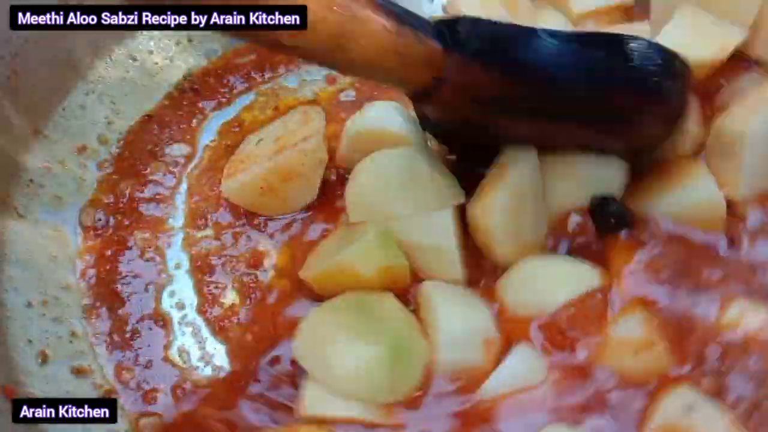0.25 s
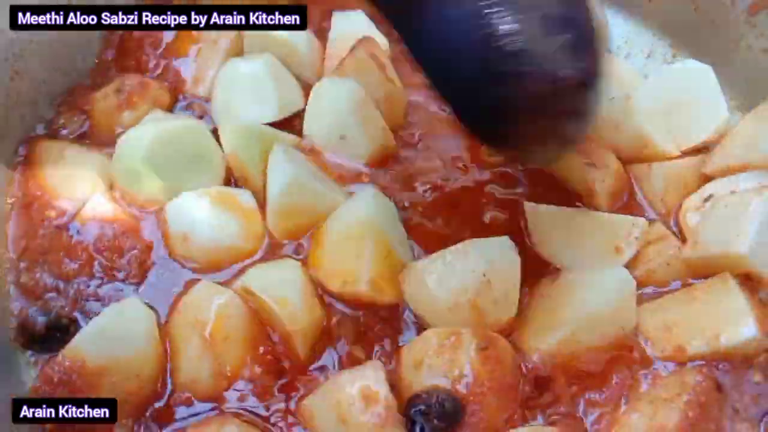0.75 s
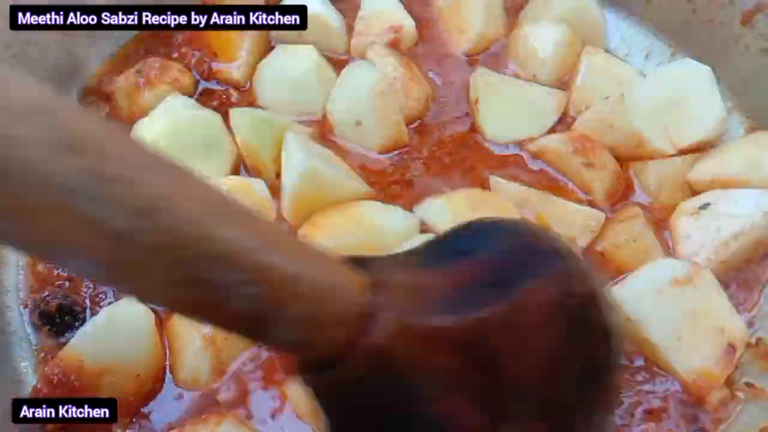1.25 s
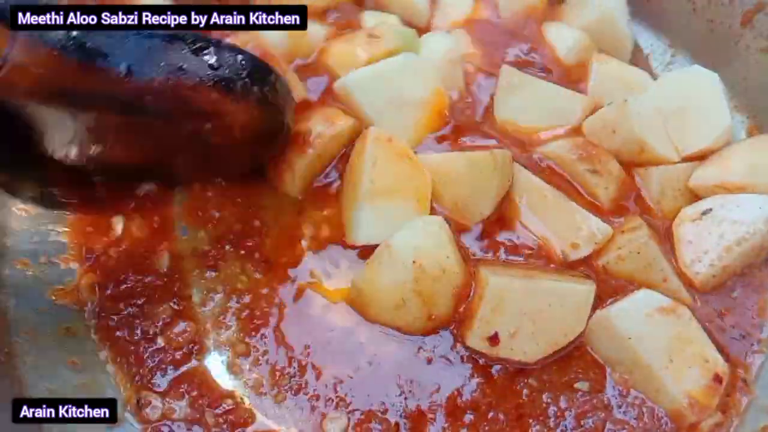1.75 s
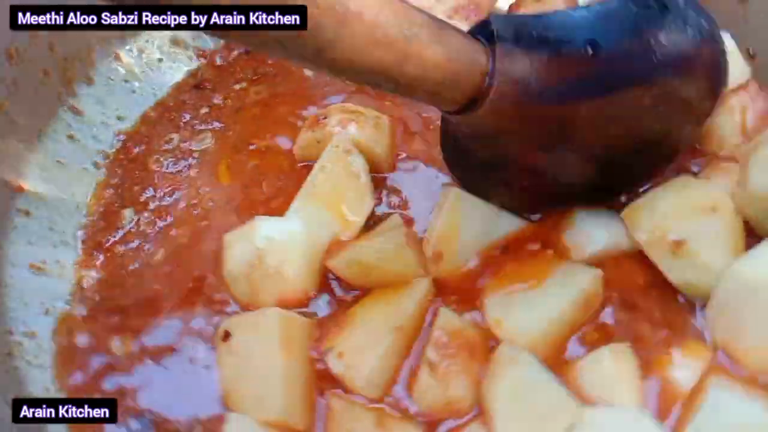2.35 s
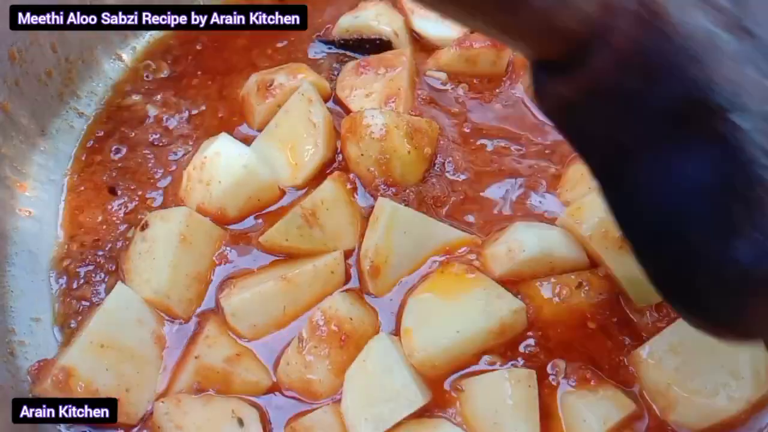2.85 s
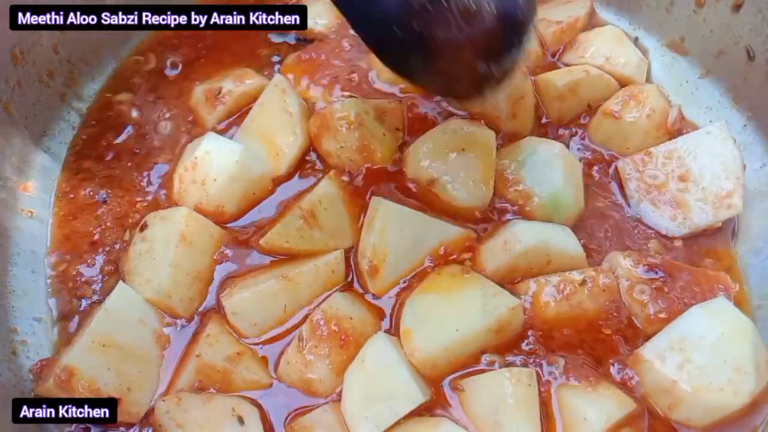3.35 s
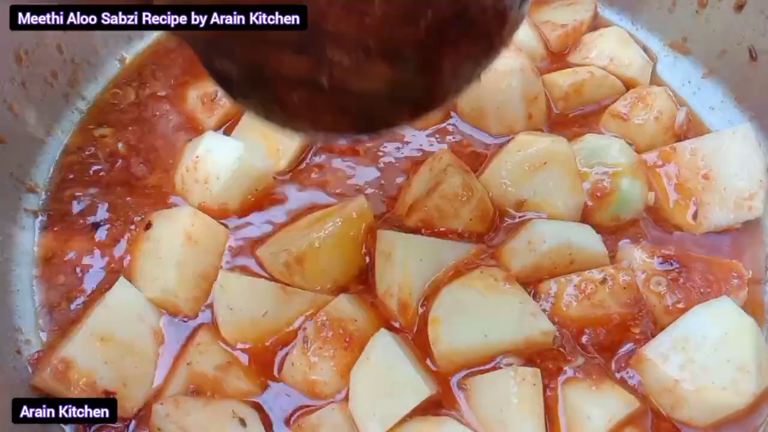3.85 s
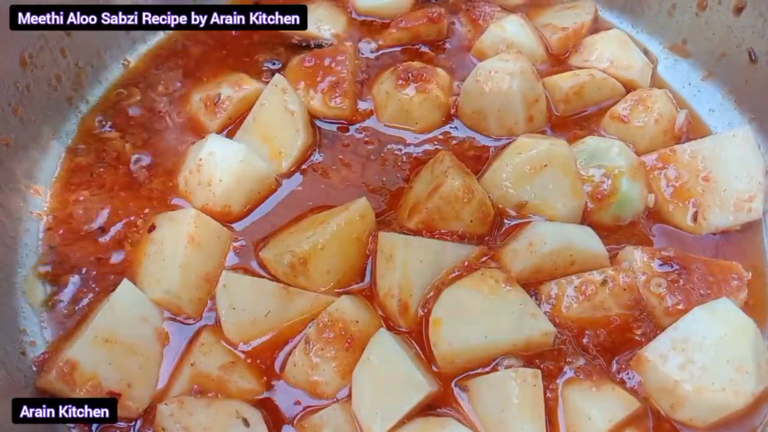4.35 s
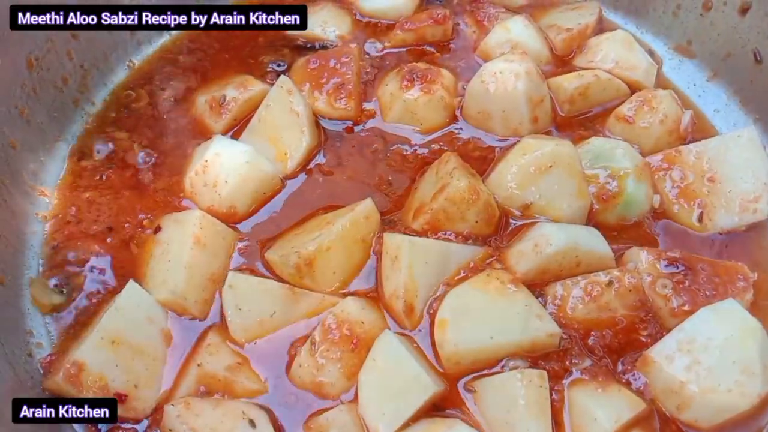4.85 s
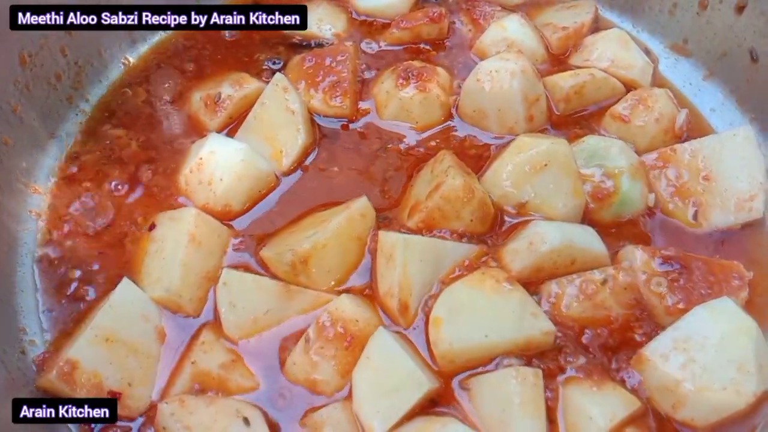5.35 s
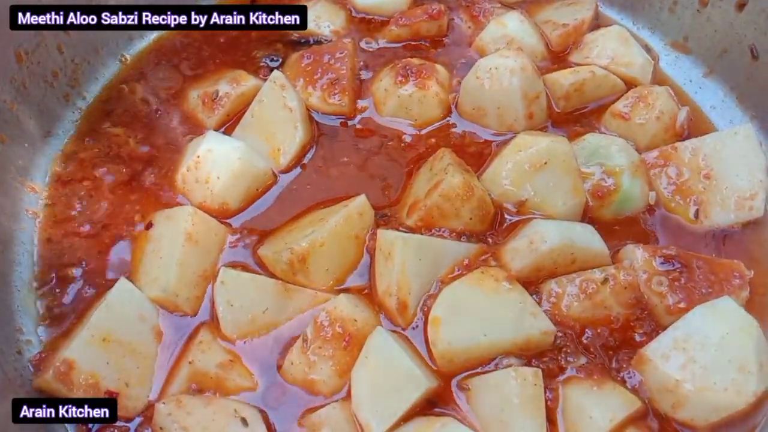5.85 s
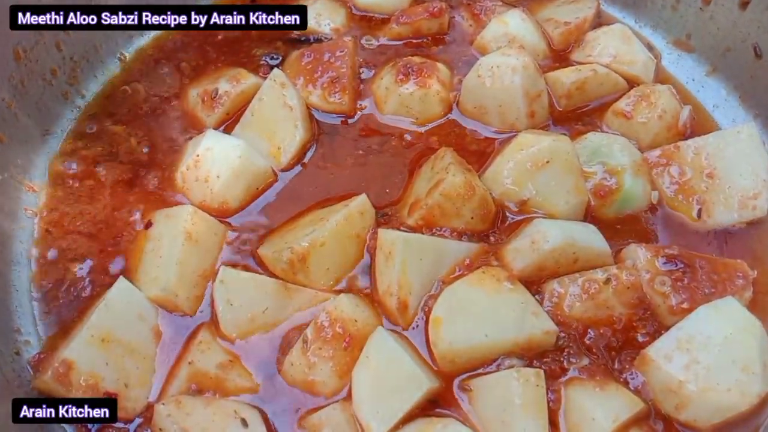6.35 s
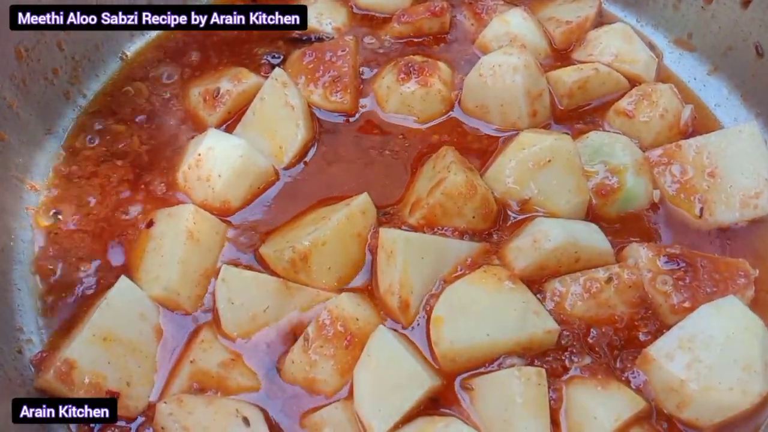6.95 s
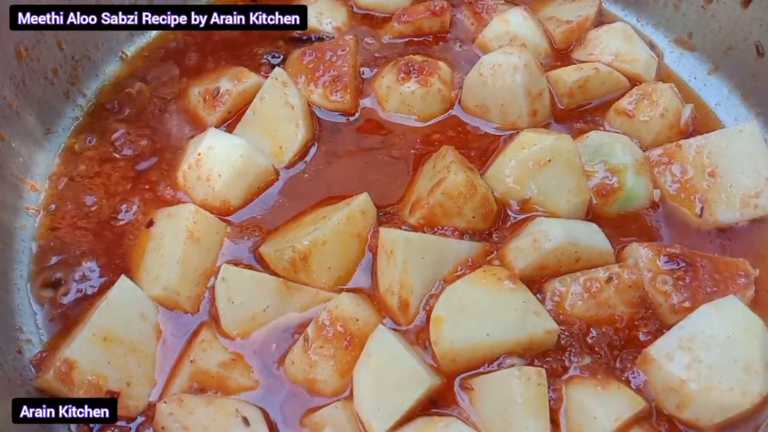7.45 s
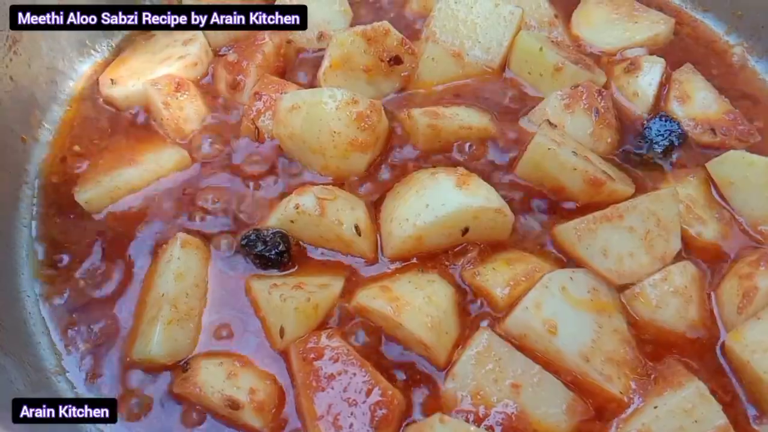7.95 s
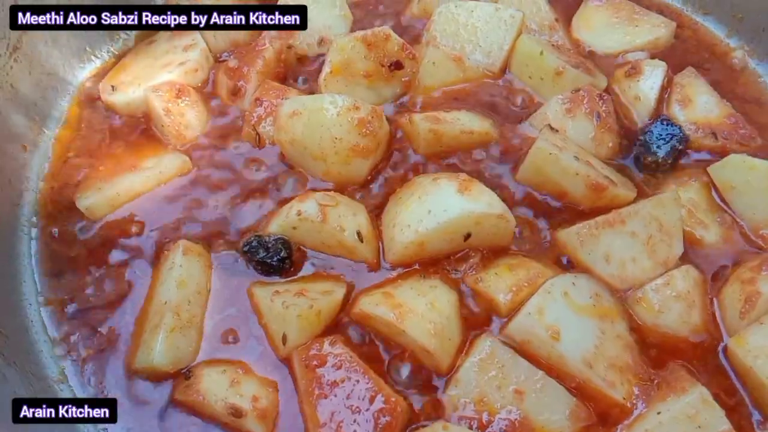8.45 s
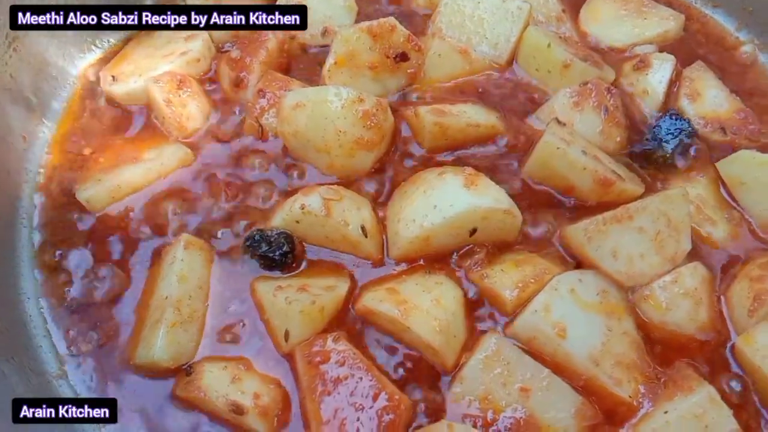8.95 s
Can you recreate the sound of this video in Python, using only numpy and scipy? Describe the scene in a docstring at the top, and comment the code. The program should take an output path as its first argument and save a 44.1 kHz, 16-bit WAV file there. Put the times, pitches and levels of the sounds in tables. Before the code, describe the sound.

Close above a wide metal pan in a kitchen with short, low reverberation, gravy bubbles softly with fine oil crackle and a deep, faint steam hum. From 0.2 to 0.7 seconds chunks bump dully and the wooden spoon knocks lightly; a clearer knock with a booming base falls at 1.0, a soft one at 1.3. Searing swells quickly to a peak near 1.8 and is quenched. Rasping scrapes run from 2.0 to about 4.1, deepening in pitch, with a hard, bright clack at 3.0 and muffled double knocks near 3.7. From 4.3 the simmer rises, with low rumbling surges, gurgles, a soft froth hiss around 5.1, scattered spits and rounded pops. Dull taps fall at 7.5 to 7.65, then at 7.67 the bubbling abruptly becomes louder and brighter, fizzing with crisp sputters until about 9 seconds.

```python
"""In a kitchen, with the microphone close above a wide metal pan, potato chunks are stirred into thick gravy.
A wooden spoon scrapes the base, shoves the chunks and knocks the pan, whose modes ring; smeared gravy sears.
Then the gravy comes back to a simmer, a few dull taps fall and the bubbling is suddenly louder: ringing clicks
make the small bubbles, rising sines the large bursts and the taps, filtered crackle the oil, and dense low
thumps with a deep hum the steam below. The kitchen adds a short, mostly low reverberation."""
import sys
import numpy as np
from scipy import signal
from scipy.fft import rfft, irfft
from scipy.io import wavfile
from scipy.ndimage import uniform_filter1d

SR = 44100
rng = np.random.default_rng(int(sys.argv[2]) if len(sys.argv) > 2 else 0)


def persist_wave(psi):
    """Save psi, clipped to +-1, as 16-bit WAV."""
    counts = np.round(np.clip(psi, -1, 1) * 32767).astype(np.int16)
    wavfile.write(sys.argv[1], SR, np.atleast_2d(counts).T)


N = 405719   # length in samples

# Colours of the sources close to the pan. Each row: frequency in Hz, relative gain in dB.
OIL_COLOUR = [(900, -6.5), (2600, -2), (3600, 0), (4400, -6), (5600, 3.5), (6300, -5.5), (7100, 0),
              (7900, -12), (9000, -35)]
SPRAY_COLOUR = [(6000, -67), (7900, -12), (8600, 6), (10000, 0.5), (12000, -5), (13800, -11.5), (14800, -8),
                (16000, -4.5)]
GRAVY_COLOUR = [(100, -6), (260, 3), (600, -3), (1250, -2.5), (1800, -15), (2500, -13.5)]
STEAM_COLOUR = [(20, -21), (45, -14.5), (95, -14.5), (130, 6), (190, -0.5), (270, -6.5), (400, -16),
                (1000, -69.5)]
CHUNK_COLOUR = [(90, -18), (170, 9), (260, 10), (330, 7.5), (450, -5), (600, 0.5), (1000, -10), (2500, -87)]
SEAR_COLOUR = [(700, -21), (1200, 9), (2000, 1.5), (3000, 9.5), (3900, 11.5), (4900, 3.5), (7000, 6),
               (8200, -8), (13000, -27)]
WOOD_COLOUR = [(50, -37.5), (160, -1), (650, -2.5), (930, -3.5), (1120, -11), (2200, -18), (3100, -26),
               (4000, -23.5), (4450, -9), (5400, -23), (8000, -28)]
# Air resonances between the pan's walls. Each row: frequency in Hz, relative gain in dB.
HOLLOW_COLOUR = [(350, -1), (420, 9), (480, 1), (600, 7.5), (720, 0), (900, 7.5), (1100, -3), (1300, 10.5),
                 (1620, -3.5), (1860, 5), (2100, -7.5), (2290, 0.5), (2460, -13.5), (2760, 1.5),
                 (3070, -15), (3600, 1)]
# Narrow treble resonances that the fizz rings. Each row: frequency in Hz, relative level in dB.
FIZZ_MODES = [(3610, -18), (4010, -3), (4670, 0.5), (4950, -2.5), (5260, 1.5), (5440, -1), (5820, -1.5),
              (6800, -15.5)]
# Low resonances of the gravy's hum. Each row: frequency in Hz, relative level in dB, decay by 60 dB in seconds.
HUM_MODES = [(97.9, 2.5, 0.48), (125.1, 4.5, 0.33)]
# The pan's modes, the first being the drum of its base.
# Each row: frequency in Hz, relative level in dB, decay by 60 dB in seconds before the pan is damped.
PAN_MODES = [(249.1, -9, 0.27), (412, 3.5, 0.18), (566.5, 8, 0.051), (755.7, 2.5, 0.13), (946, -9.5, 0.11),
             (1260, -0.5, 0.24), (1284, -6.5, 0.22), (1890, -4, 0.056), (2223, -10, 0.082),
             (2624, -13.5, 0.076), (4400, -16, 0.03), (5000, -11, 0.069)]
# Hot metal is bared and the oil on it fries until gravy flows back.
# Each row: start in seconds, length in seconds, relative level in dB.
BARED_PATCHES = [(-.1, 0.66, -56.5), (.74, 0.077, -59.5), (1.45, 1, -65)]
# Steam builds up under the still gravy and escapes in surges.
# Each row: start in seconds, length in seconds, level in dB before thumps and hum are balanced.
STEAM_SURGES = [(4.3, 0.92, -45), (5.1, 1.17, -41.5), (7.05, 0.44, -44.5)]
# Chunks shoved ahead of the spoon. Each row: start in seconds, length in seconds, level in dB.
CHUNK_SHOVES = [(.225, 0.039, -50), (.315, 0.081, -46), (.67, 0.045, -51), (1.325, 0.053, -53.5),
                (2.18, 0.031, -53), (3.03, 0.037, -41.5), (3.24, 0.076, -47.5), (3.655, 0.074, -53.5)]
# Spoon against the pan. Each row: start in seconds, relative strength in dB, contact cut-off in Hz,
# drive of the base relative to the contact in dB.
SPOON_KNOCKS = [(.229, -28, 615, -2), (0.3828, -26.5, 1700, -12), (1.0372, -13, 2270, 6),
                (1.323, -24.5, 607, 7.5), (2.184, -30, 436, 17), (2.996, -7, 4800, -20),
                (3.655, -23, 375, 6.5), (3.68, -21.5, 310, 6)]
# Crisp spits of oil, and at 7.683 s a faint click that is none.
# Each row: start in seconds, relative level in dB, centre in Hz.
SPITS_AND_CLICK = [(.3536, -50, 6100), (3.518, -56, 1900), (4.694, -49, 1650), (4.709, -52, 1900),
                   (4.891, -50, 1680), (6.981, -52, 5100), (7.683, -60.5, 2370), (8.932, -52, 2080)]
# The spoon rubs the wall. Each row: start in seconds, length in seconds, level in dB.
WALL_RUBS = [(1.58, 0.025, -62)]
# Strokes of the spoon over the base. Each row: start in seconds, length in seconds, level in dB,
# rasp at the start in Hz, rasp at the end in Hz.
SPOON_STROKES = [(1.996, 0.57, -59, 1980, 1400), (2.547, 0.77, -56.5, 900, 728),
                 (3.44, 0.69, -62.5, 760, 684)]
# Large bursting bubbles, and at 7.517, 7.623 and 7.647 s short dull taps, perhaps from handling.
# Each row: start in seconds, relative peak in dB, starting pitch in Hz.
POPS_AND_TAPS = [(3.233, -33.5, 896), (3.301, -43, 1605), (3.322, -41, 3960), (4.788, -39.5, 620),
                 (4.891, -44.5, 2760), (5.529, -44.5, 1810), (5.034, -37, 510), (5.963, -56.5, 2750),
                 (6.0707, -55, 2700), (6.156, -46.5, 1290), (6.3546, -37, 1327), (6.766, -35.5, 1350),
                 (6.981, -37.5, 1430), (7.06, -48.5, 1880), (7.289, -41, 1260), (7.49, -41, 1360),
                 (7.517, -30, 610), (7.623, -27, 426), (7.647, -26.5, 497), (8.541, -37, 1260),
                 (8.932, -46, 1890)]
# Runs of deep bubbles. Each row: start in seconds, length in seconds, level in dB, middle pitch in Hz.
GURGLE_RUNS = [(4.50, 0.041, -54, 453), (4.955, 0.084, -49, 346), (5.12, 0.062, -51, 288),
               (5.66, 0.043, -50, 510), (5.84, .16, -55.5, 450), (6.03, 0.1, -49.5, 298),
               (7.265, .04, -40, 130.6), (7.41, .035, -41, 131)]
# Froth hisses up. Each row: start in seconds, length in seconds, level in dB, middle pitch in Hz.
FROTH_HISSES = [(5.06, 0.16, -58.5, 5420)]
# Boiling froth sputters in a quick run of crackles. Each row: start in seconds, level in dB.
FROTH_SPUTTERS = [(7.711, -57), (8.014, -54.5), (8.14, -56), (8.229, -56.5), (8.304, -57), (8.72, -55.5),
                  (8.828, -57.5), (9.015, -54)]

OIL_DB, PLOP_DB, FIZZ_DB, STEAM_DB = -66.5, -61, -69, -54   # base levels while the pan is stirred
OIL_FOLLOWS, FIZZ_FOLLOWS = 0.079, 0.9   # share of the rise in vigour
SPRAY_DB, SPRAY_EXTRA_DB = -10.5, 6.5   # fine spray relative to the oil; extra once the bubbling steps up
FIZZ_T60_S = 0.044
SIMMER_S, SIMMER_RISE_S, SIMMER_DB = 4.31, 0.37, 5.5   # left alone, the gravy comes back to a simmer
STEP_S, STEP_RISE_S, STEP_DB = 7.67, 0.0093, 4   # from here the bubbling is abruptly louder
BARE_S, COVER_S = 0.046, 0.37   # rise and decay time of the frying
SURGE_RISE_S, SURGE_FALL_S = 0.18, 0.25
SHOVE_RISE_S, SHOVE_FALL_S = 0.017, 0.073
SETTLE_S, SETTLE_DB_PER_S = 0.039, 230   # spoon and gravy settle back on the metal and damp it
RUB_HZ, RUB_T60_S, RUB_RISE_S, RUB_FALL_S = 1270, 0.14, 0.008, 0.013
# gravy smeared onto bare hot metal sears ever louder, then is quenched
SEAR_PEAK_S, SEAR_DB, SEAR_GROWTH_DB_PER_S, QUENCH_DB_PER_S = 1.838, -44.5, 108, 251
STROKE_RISE_S, STROKE_FALL_S = 0.0096, 0.08
SPUTTER_S, SPUTTER_HZ = 0.022, 5100   # length of a crackle, and the pitch they scatter round
KITCHEN_T60_S, CUTOFF_HZ = 0.28, 15600


def from_db(db):
    """Decibels to gain."""
    return 10 ** (np.asarray(db) / 20)


def rms_one(x):
    """Scale to unit power."""
    return x / np.sqrt(np.mean(x ** 2) + 1e-20)


def drift(rate):
    """Slow random curve of unit rms, with so many turning points per second."""
    steps = np.arange(N) * rate / SR
    return rms_one(np.interp(steps, np.arange(4000), rng.standard_normal(4000)))


def ramp(start_s, rise_s):
    """From 0 to 1 in a straight line."""
    return np.clip((np.arange(N) / SR - start_s) / rise_s, 0, 1)


def swells(rows, rise_s, fall_s):
    """Gain of events that rise, hold and die away; their powers add."""
    t = np.arange(N) / SR
    gains = []
    for s, length, db, *_ in rows:
        fall = np.exp(-np.clip((t - s - length) / fall_s, 0, 20))
        gains.append(from_db(db) * ramp(s, rise_s) * fall)
    return np.linalg.norm(gains, axis=0)


def vigour():
    """How loud the gravy bubbles, in dB above the stirred pan."""
    simmering = SIMMER_DB * ramp(SIMMER_S, SIMMER_RISE_S)
    return simmering + STEP_DB * ramp(STEP_S, STEP_RISE_S)


def through(x, response):
    """Pass a sound through an impulse response."""
    return signal.oaconvolve(x, response)[:N]


def colour(x, *spectra, size=8192):
    """Causal (minimum-phase) filter that follows the sum of some spectra in dB."""
    log_hz = np.log(np.maximum(np.fft.rfftfreq(size, 1 / SR), 1))
    db = sum(np.interp(log_hz, np.log(hz), level) for hz, level in map(np.transpose, spectra))
    cepstrum = irfft(np.log(from_db(db)))
    # folding the cepstrum forward in time gives minimum phase
    cepstrum[1:size // 2] *= 2
    cepstrum[size // 2 + 1:] = 0
    return through(x, irfft(np.exp(rfft(cepstrum))))


def band(x, hz, octaves):
    """Keep a band round a centre; unit power."""
    edges = np.minimum(hz * 2 ** (np.array([-.5, .5]) * octaves), .45 * SR)
    return rms_one(signal.sosfilt(signal.butter(2, edges, "band", fs=SR, output="sos"), x))


def ring(clicks, hz, t60):
    """A unit click sets a decaying sine of about height 1 ringing."""
    r = from_db(-60 / (t60 * SR))
    w = 2 * np.pi * hz / SR
    return signal.lfilter([0, np.sin(w)], [1, -2 * r * np.cos(w), r * r], clicks + 1e-18)


def add(out, s, sound):
    """Mix a short sound in at time s."""
    start = int(s * SR)
    out[start:start + len(sound)] += sound[:N - start]


def echoes(x, t60, delay_s):
    """Dense reflections of unit energy that begin after a delay and die away."""
    t = np.arange(SR // 2) / SR
    tail = rng.standard_normal(len(t)) * from_db(-60 * t / t60) * (t > delay_s)
    return through(x, tail / np.linalg.norm(tail))


def grains(per_s, spread_db, clump_db):
    """Random clicks of either sign in flurries, their sizes spread by so many dB."""
    born = rng.random(N) < per_s * from_db(clump_db * drift(25)) / SR
    sizes = rng.laplace(size=N)[born]
    clicks = np.zeros(N)
    clicks[born] = np.sign(sizes) * from_db(spread_db * np.minimum(np.abs(sizes), 5))
    return clicks


def bubbles(bursts, low_hz, high_hz, cycles, count=20):
    """Each burst rings for a few cycles; bubbles that come together are of like size."""
    sizes = 0.56 * drift(22) + .2 * rng.standard_normal(N)
    dealt = np.floor(count * sizes).astype(int) % count
    pitches = np.geomspace(low_hz, high_hz, count)
    return sum(ring(bursts * (dealt == k), hz, cycles / hz) * hz for k, hz in enumerate(pitches))


def patchy(x, depth_db, count=7):
    """Let the part below 3.3 kHz and each slice from there to 12 kHz flutter on its own."""
    out = 0
    for hz in np.geomspace(3300, 12000, count):
        low = signal.sosfiltfilt(signal.butter(4, hz, fs=SR, output="sos"), x)
        out = out + low * from_db(depth_db * drift(28))
        x = x - low
    return out + x


def sizzle(snap_s=0.0036):
    """Water droplets burst in hot oil, each a short puff of steam; the largest throw a fine bright spray."""
    level = np.hypot(from_db(OIL_DB + OIL_FOLLOWS * vigour()), swells(BARED_PATCHES, BARE_S, COVER_S))
    spray_db = SPRAY_DB + SPRAY_EXTRA_DB * ramp(STEP_S, STEP_RISE_S)
    snaps = grains(per_s=2600, spread_db=2.5, clump_db=1.5)
    puff_power = signal.lfilter([1], [1, -np.exp(-1 / (snap_s * SR))], snaps ** 2 + 1e-18)
    puffs = np.sqrt(puff_power) * rng.standard_normal(N)
    crackle = rms_one(puffs) + rms_one(snaps)
    oil = rms_one(colour(crackle, OIL_COLOUR, HOLLOW_COLOUR))
    largest = rms_one(snaps * np.abs(snaps))   # squaring favours the large snaps
    spray = rms_one(colour(crackle + 0.33 * largest, SPRAY_COLOUR)) * from_db(spray_db)
    return level * patchy(oil + spray, depth_db=3.5)


def simmer(flutter_db=5.0):
    """Small bubbles plop in the hollow of the pan; the tiniest fizz in flurries and ring the air in it."""
    plop_db = PLOP_DB + vigour()
    fizz_db = FIZZ_DB + FIZZ_FOLLOWS * vigour()
    bursts = grains(per_s=2200, spread_db=1.3, clump_db=2)
    plops = bubbles(bursts, low_hz=235, high_hz=2000, cycles=36, count=24)
    plops = rms_one(colour(plops, GRAVY_COLOUR, HOLLOW_COLOUR))
    ticks = grains(per_s=2500, spread_db=2.4, clump_db=2.5)
    fizz = np.zeros(N)
    for k, (hz, db) in enumerate(FIZZ_MODES):
        flutter = from_db(db + flutter_db * drift(20))
        fizz += (-1) ** k * flutter * rms_one(ring(ticks, hz, FIZZ_T60_S))
    tiny_bursts = grains(per_s=340, spread_db=5.5, clump_db=1.0)
    pips = bubbles(tiny_bursts, low_hz=3950, high_hz=7320, cycles=110, count=10)
    treble = rms_one(fizz) + from_db(-8.0) * rms_one(pips)
    return from_db(plop_db) * plops + from_db(fizz_db) * treble


def rumble(even_s=0.24):
    """Steam pockets collapse on the base in dense low thumps; the gravy over them gives a deep, even hum."""
    level = np.hypot(from_db(STEAM_DB), swells(STEAM_SURGES, SURGE_RISE_S, SURGE_FALL_S))
    thumps = rms_one(colour(grains(per_s=250, spread_db=-3.0, clump_db=1.0), STEAM_COLOUR))
    hum = np.zeros(N)
    for hz, db, t60 in HUM_MODES:
        nudges = grains(per_s=180, spread_db=0.0, clump_db=3.5)
        hum += from_db(db) * rms_one(ring(nudges, hz, t60))
    hum = band(hum, 121.5, 1.7)
    # dividing by the running level keeps the hum even
    hum = hum / np.sqrt(np.abs(uniform_filter1d(hum ** 2, size=int(even_s * SR))) + 1e-12)
    return level * (from_db(-6.5) * thumps + from_db(-3.5) * hum)


def shoves():
    """Chunks tumble ahead of the spoon in flurries of dull bumps."""
    bumps = rms_one(colour(grains(per_s=1000, spread_db=1.2, clump_db=3.0), CHUNK_COLOUR))
    return swells(CHUNK_SHOVES, SHOVE_RISE_S, SHOVE_FALL_S) * bumps


def knocks(swell_s=0.018):
    """Wood strikes the pan, dull where gravy or a chunk cushions it; the wall rings and the base booms."""
    contact, on_wall, on_base = np.zeros((3, N))
    for s, strength_db, cut_hz, boom_db in SPOON_KNOCKS:
        cushion = signal.butter(4, cut_hz, fs=SR, output="sos")
        push = from_db(strength_db) * signal.sosfilt(cushion, signal.unit_impulse(SR // 20))
        add(contact, s, push)
        # a gentle spoon stays on the wall and mutes it
        add(on_wall, s, push * min(1, from_db(strength_db + 20.5)))
        add(on_base, s, push * from_db(boom_db))
    t = np.arange(SR // 2) / SR
    swell = 1 - np.exp(-t / swell_s)   # the blow takes a moment to spread round the metal
    settle_db = SETTLE_DB_PER_S * np.maximum(t - SETTLE_S, 0)
    modes = []
    for hz, db, t60 in PAN_MODES:
        modes.append(swell * from_db(db - settle_db - 60 * t / t60) * np.sin(2 * np.pi * hz * t))
    base, *wall = modes
    metal = from_db(-9.0) * (through(on_wall, sum(wall)) + through(on_base, base))
    clack = from_db(20.5) * colour(contact, WOOD_COLOUR)
    dull_clack = signal.lfilter(*signal.butter(1, 1300, fs=SR), clack)
    body = from_db(3.5) * echoes(dull_clack, t60=0.14, delay_s=0.004)
    return metal + clack + body + from_db(4.5) * echoes(clack, t60=0.021, delay_s=0.0022)


def spits_and_click(t60=0.045, width_octaves=0.75):
    """Broad, dry ticks of fading noise: water trapped in oil flashes to steam; one is only a faint click."""
    out, t = np.zeros(N), np.arange(SR // 20) / SR
    for s, level_db, hz in SPITS_AND_CLICK:
        fade = from_db(level_db + 4 - 60 * t / t60)
        add(out, s, fade * band(rng.standard_normal(len(t)), hz, width_octaves))
    return out


def rubs():
    """The spoon drags along the wall and sets its clearest mode singing."""
    singing = rms_one(ring(grains(per_s=900, spread_db=12.0, clump_db=11), RUB_HZ, RUB_T60_S))
    return swells(WALL_RUBS, RUB_RISE_S, RUB_FALL_S) * singing


def sear():
    """Gravy smeared on hot metal boils off in dense clicks that swell to a peak and are then quenched."""
    since_peak = np.arange(N) / SR - SEAR_PEAK_S
    below_peak_db = np.maximum(-SEAR_GROWTH_DB_PER_S * since_peak, QUENCH_DB_PER_S * since_peak)
    clicks = grains(per_s=4900, spread_db=1.0, clump_db=6.0)
    return from_db(SEAR_DB - below_peak_db) * rms_one(colour(clicks, SEAR_COLOUR, HOLLOW_COLOUR))


def scrape(count=10, width_octaves=0.32, wander_octaves=0.11):
    """The spoon slips over the base in a rasp that wanders in pitch and deepens as it sinks in."""
    glides = []
    for s, length, _, first_hz, last_hz in SPOON_STROKES:
        glides += [(s, first_hz), (s + length, last_hz)]
    stroke_hz = np.interp(np.arange(N) / SR, *np.transpose(glides))
    centre_hz = stroke_hz * 2 ** (wander_octaves * drift(12))
    slips, rasp = grains(per_s=1800, spread_db=2.0, clump_db=4.5), np.zeros(N)
    for hz in np.geomspace(620, 2300, count):
        nearness = np.exp(-.5 * (np.log2(hz / centre_hz) / width_octaves) ** 2)
        rasp += nearness * rms_one(ring(slips * rng.standard_normal(N), hz, 32 / hz))
    rasp = signal.lfilter(*signal.butter(2, 500, "high", fs=SR), rasp)
    return swells(SPOON_STROKES, STROKE_RISE_S, STROKE_FALL_S) * rms_one(colour(rasp, HOLLOW_COLOUR))


def pops_and_taps(glide=0.021, skin_db=-21, longest_s=0.019):
    """A large bubble tears open and rings with rising pitch, damped more when deep; so do the dull taps."""
    out, t = np.zeros(N), np.arange(SR // 10) / SR
    for s, peak_db, hz in POPS_AND_TAPS:
        damping = 1 + (500 / hz) ** 2
        age = t * damping / longest_s
        envelope = from_db(-60 * age) * (1 - np.exp(-t * hz * damping / 3))
        tone = np.sin(2 * np.pi * hz * np.cumsum(1 + glide * np.minimum(age, 1)) / SR)
        skin = damping * rms_one(ring(rng.standard_normal(len(t)), hz, 7 / hz))
        add(out, s, from_db(peak_db) * envelope / envelope.max() * (tone + from_db(skin_db) * skin))
    bright = signal.lfilter(*signal.butter(2, 900, "high", fs=SR), out)
    return out + echoes(bright, t60=0.061, delay_s=0.0021)


def flurries(rows, per_s, cycles, scatter_octaves):
    """Runs of like-sized bubbles that swell and fade, each bubble ringing at a pitch of its own."""
    out, t = np.zeros(N), np.arange(SR // 10) / SR
    for s, length, db, hz in rows:
        when, size, strength = rng.random((3, 200))
        count = int(np.clip(per_s * length, 2, 200))
        run = np.zeros(SR // 2)
        for k in range(count):
            place = (k + when[k]) / count   # 0 to 1 along the run
            pitch = hz * 2 ** (scatter_octaves * (2 * size[k] - 1))
            height = (.5 + strength[k]) * np.sqrt(np.sin(np.pi * place))
            fade = from_db(-60 * t * pitch / cycles)
            add(run, place * length, height * fade * np.sin(2 * np.pi * pitch * t))
        add(out, s, from_db(db) * run / np.sqrt(np.sum(run ** 2) / (length * SR)))
    return out


def vents():
    """Steam breaks through: gurgles where the gravy is deep, soft hisses and crisp sputters where it froths."""
    gurgles = flurries(GURGLE_RUNS, per_s=110, cycles=24, scatter_octaves=0.29)
    hisses = flurries(FROTH_HISSES, per_s=630, cycles=160, scatter_octaves=0.14)
    crackles = [(s, SPUTTER_S, db, SPUTTER_HZ * 2 ** rng.normal(0, 0.13)) for s, db in FROTH_SPUTTERS]
    sputters = flurries(crackles, per_s=700, cycles=74, scatter_octaves=0.27)
    return gurgles + hisses + sputters


def scene():
    """All sources are summed close to the microphone; the kitchen gives back the lows of all but the rumble."""
    stirring = shoves() + knocks() + rubs() + sear() + scrape()
    close = sizzle() + simmer() + stirring + spits_and_click() + pops_and_taps() + vents()
    lows = signal.lfilter(*signal.butter(2, 850, fs=SR), close)
    kitchen = echoes(lows, t60=KITCHEN_T60_S, delay_s=0.006)
    return (close + rumble() + from_db(-4.5) * kitchen)[None]


def record(dry):
    """The top is cut steeply."""
    return signal.sosfilt(signal.ellip(12, .2, 80, CUTOFF_HZ, fs=SR, output="sos"), dry)


dry = scene()
out = record(dry)
persist_wave(out)
```